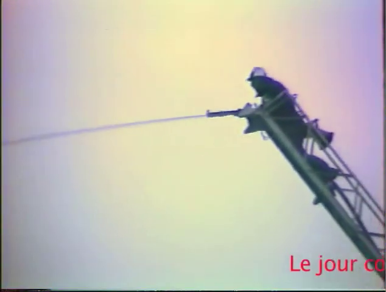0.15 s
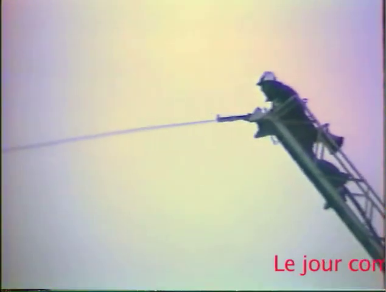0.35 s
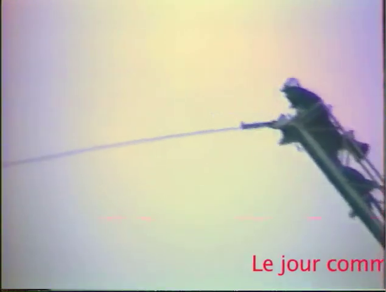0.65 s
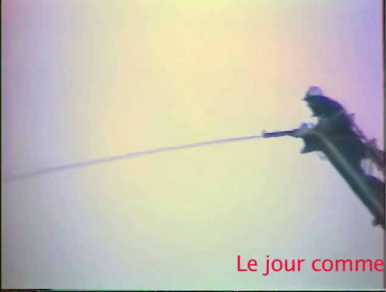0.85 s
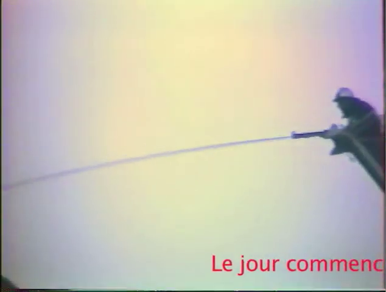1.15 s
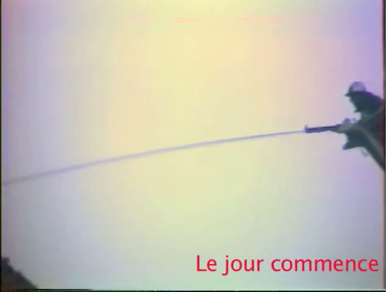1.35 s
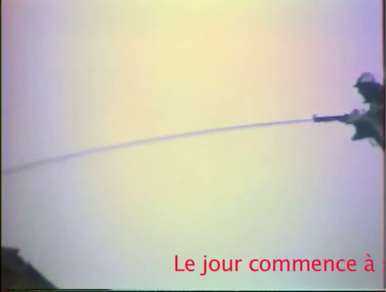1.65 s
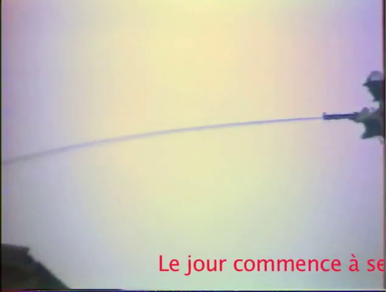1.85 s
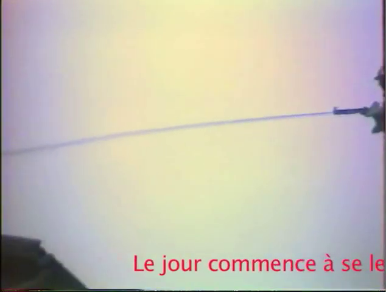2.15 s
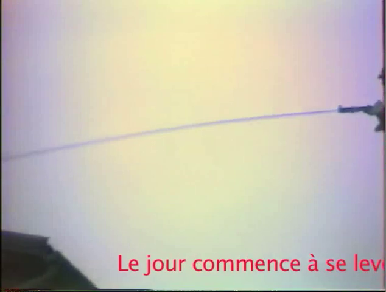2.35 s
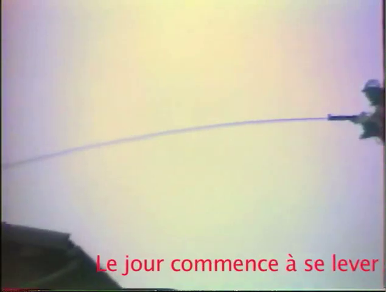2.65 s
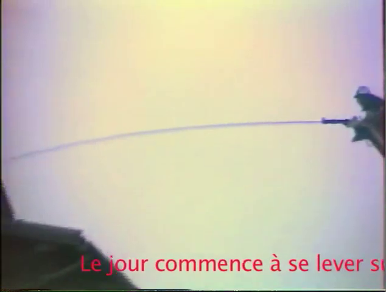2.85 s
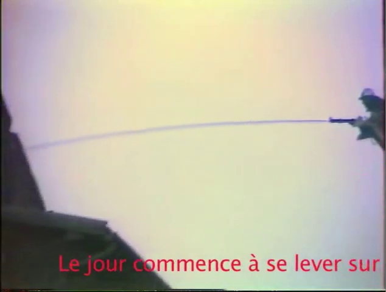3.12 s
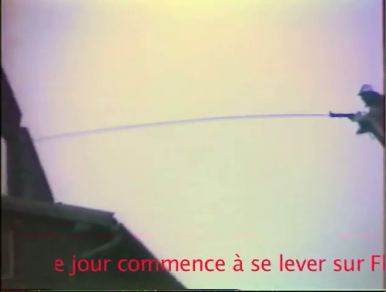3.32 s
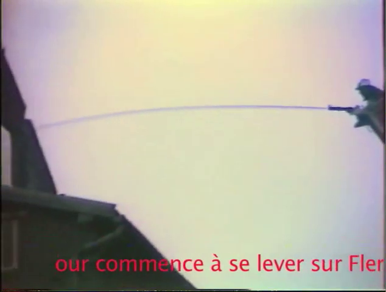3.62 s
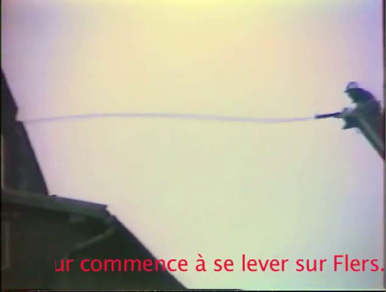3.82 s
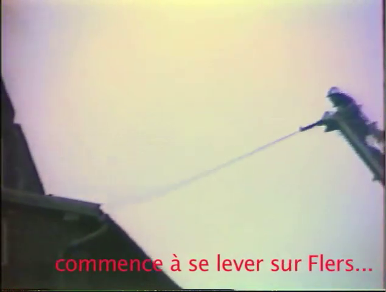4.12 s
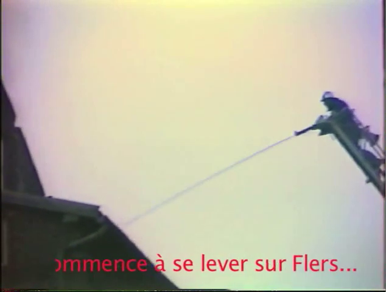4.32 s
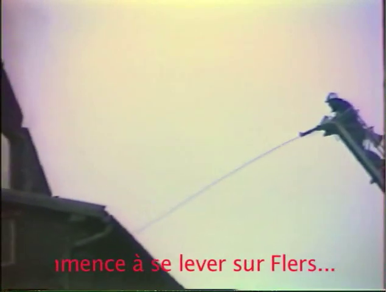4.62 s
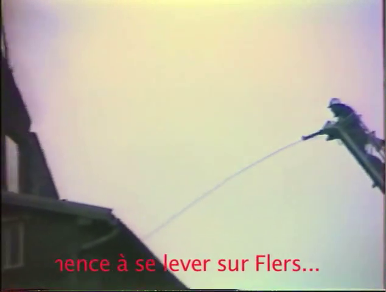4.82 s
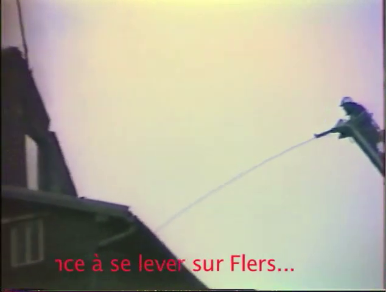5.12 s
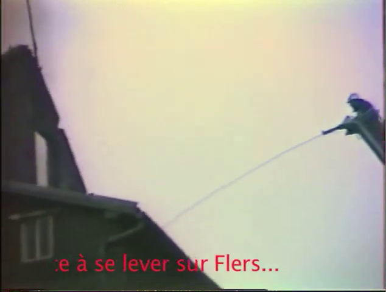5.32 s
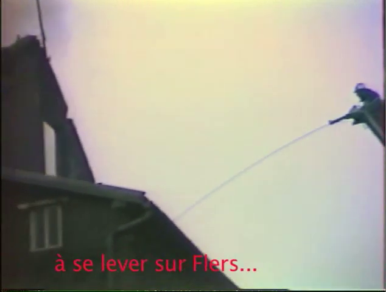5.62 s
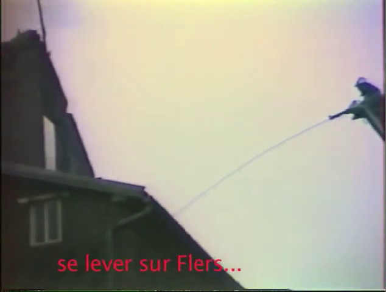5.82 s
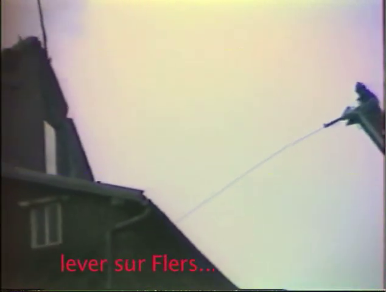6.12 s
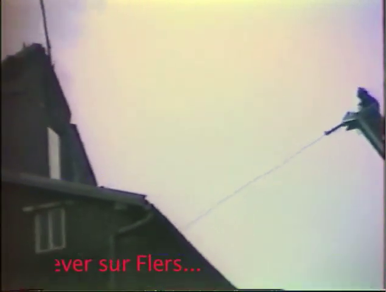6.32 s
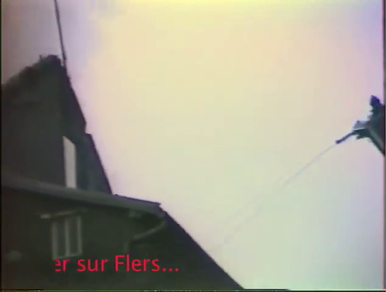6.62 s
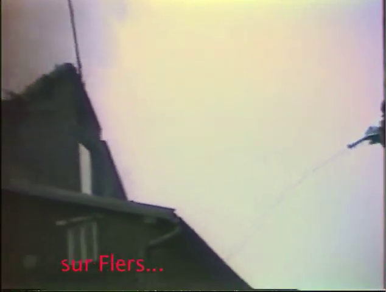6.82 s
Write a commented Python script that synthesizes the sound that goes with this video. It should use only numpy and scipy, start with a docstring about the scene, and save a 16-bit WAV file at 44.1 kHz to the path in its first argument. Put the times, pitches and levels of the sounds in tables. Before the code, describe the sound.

Constant buzzing engine and pump drone around 260 to 305 hertz, rapidly beating, over thin metal ringing and steady water hiss.

```python
"""A throbbing drone stands in front: two loud engine orders of a fire engine's motor beat once a turn.
The shaft turns about 44 times a second and drives the water pump; two firings a turn add a thud.
Upper orders growl, two panels buzz, shaped noise clatters once a turn and narrow resonances ring thinly.
Water hisses brightly through the hose and out of the nozzle on the ladder, as noise pulsing with the shaft.
A second, fainter engine hums just above the firing rate. One microphone feeds both channels."""
import sys
import numpy as np
from scipy import signal
from scipy.fft import rfft, irfft, next_fast_len
from scipy.io import wavfile

SR = 44100
rng = np.random.default_rng(int(sys.argv[2]) if len(sys.argv) > 2 else 0)


def wav_out(sig):
    """Save sig, one row per channel (or a flat mono array), as 16-bit PCM at SR to the path in sys.argv[1]."""
    wavfile.write(sys.argv[1], SR, np.round(np.clip(np.atleast_2d(sig).T, -1, 1) * 32767).astype(np.int16))


N = 306936

# Shaft speed, hunting and sagging once: (time [s], speed [turns/s])
SHAFT_SPEED = [(0.0, 43.81), (0.6, 43.54), (1.08, 43.76), (1.2, 43.6), (1.68, 43.78), (1.92, 43.62),
               (3.6, 43.67), (3.84, 43.22), (3.96, 43.54), (4.56, 43.77), (4.92, 43.55), (5.16, 43.77),
               (5.4, 43.53), (5.52, 43.81), (5.76, 43.55), (5.88, 43.86), (6.0, 43.58), (6.96, 43.95)]
# Upper orders of the growl, relative to its level: (order [multiples of shaft speed], level [dB])
GROWL_ORDERS = [(9.5, -26), (10.5, -28), (12, -17), (13, -18.5), (13.5, -28), (14, -24.5), (17, -23.5),
                (18, -21), (19, -21.5), (20, -28), (22, -31.5), (23, -24), (24.5, -27), (25, -34),
                (26, -31), (28, -29.5), (30, -28), (31, -38), (36, -23.5)]
# Spectrum shape of block and pump noise: (frequency [Hz], relative density [dB])
CLATTER_SPECTRUM = [(25, -34), (60, -19), (110, -11), (140, -6), (180, -10), (280, 9), (370, -1), (650, 0),
                    (920, -3), (1150, -1), (1700, -2.5), (2300, -10.5), (3500, -14.5), (9000, -18)]
# Spectrum shape of water in hose and nozzle: (frequency [Hz], relative density [dB])
WATER_SPECTRUM = [(1000, -19), (2500, -4.5), (3400, -6), (4600, -5), (6000, -3), (7200, -0.5), (8200, -0.5),
                  (9300, 2), (10200, -0.5), (11000, -19.5)]
# Ringing modes of the metal: (frequency [Hz], width [Hz], level relative to the ringing layer [dB])
METAL_MODES = [(1196, 97, -16), (1940, 160, -9.5), (2522, 36, -16), (2738, 20, -16), (3800, 130, -13),
               (5080, 87, -13), (5350, 200, -9), (6180, 59, -12), (6720, 60, -10), (6940, 90, -10),
               (7390, 200, -5.5), (7496, 63, -1), (7710, 110, 0.5), (8710, 105, -3), (10065, 83, -7.5)]
# Low exhaust orders, in or against phase: (order [multiples of shaft speed], level [dB], sign [+1 or -1])
EXHAUST_ORDERS = [(1, -68, 1), (3, -62.5, -1), (4, -45.5, -1), (4.5, -54, 1), (5, -42.5, 1), (8, -47, -1),
                  (9, -42, 1), (10, -46, 1), (11, -45.5, 1)]
# Rate of the second engine's hum above the firing rate: (time [s], beat rate [beats/s])
SECOND_ENGINE_BEAT_RATE = [(0, 3.45), (3.7, 3.45), (3.9, 3.9), (6.96, 3.9)]
# Level laws of the layers, before their own offsets and swings:
# (level at governed speed and time 0 [dB], change with speed [dB per turn/s], creep [dB/s])
SIXTH_ORDER_LAW = (-28, -5, 0.046)
SEVENTH_ORDER_LAW = (-24.5, -0.5, -0.27)
THUD_LEVEL_LAW = (-48.0, 1.0, 0.25)
GROWL_LEVEL_LAW = (-26, 8.7, 0.23)
CLATTER_LEVEL_LAW = (-33, 3.5, 0.12)
HISS_LEVEL_LAW = (-31.0, 2.4, 0.2)   # shared by ringing and water

GOVERNED_SPEED = 43.66   # turns per second
CUTOFF_HZ = 10500
SECOND_ENGINE_DB, FIRST_BEAT_S = -59, 0.059

# Just after the speed sags, the buzz passes briefly from the high panel to the low one
SHIFT_S, SHIFT_HALF_LENGTH_S = 3.94, 0.12   # centre, and time from there to half height
LOW_PANEL_DB, LOW_PANEL_SHIFT_DB = -53, 10.5   # shift in dB is added in full at the centre
HIGH_PANEL_DB, HIGH_PANEL_SHIFT_DB = -47, -5
SIXTH_SHIFT_DB, GROWL_SHIFT_DB, CLATTER_SHIFT_DB = 1.3, -5, 0.2


def from_db(db):
    """Decibels to amplitude gain."""
    return 10 ** (np.asarray(db) / 20)


def rms_one(x):
    """Scale to unit power."""
    return x / np.sqrt(np.mean(x ** 2) + 1e-20)


def curve_in_time(rows):
    """Join (time, value) points by straight lines, one value a sample."""
    times, values = np.transpose(rows)
    return np.interp(np.arange(N) / SR, times, values)


def drift(rate_hz):
    """Random wandering of unit power: noise through two equal low-pass poles at rate_hz."""
    step = 40   # samples between computed points
    pole = np.exp(-2 * np.pi * step * rate_hz / SR)
    noise = rng.standard_normal(N // step + 2002)
    slow = signal.lfilter([1], [1, -2 * pole, pole * pole], noise)
    slow = rms_one(slow[2000:])   # drop the filter's start
    return np.interp(np.arange(N) / step, np.arange(len(slow)), slow)


def coloured_noise(spectrum):
    """Unit-power noise, its spectrum joined by straight lines in dB over log frequency."""
    hz, db = np.transpose(spectrum)
    size = next_fast_len(N, real=True)
    bins_hz = np.maximum(np.fft.rfftfreq(size, 1 / SR), 1)
    gain = from_db(np.interp(np.log(bins_hz), np.log(hz), db))
    white = rfft(rng.standard_normal(size))
    return rms_one(irfft(white * gain, size)[:N])


def ringing_noise(hz, width_hz):
    """Unit-power noise through one two-pole resonance, as of a struck or rubbed part."""
    r = np.exp(-np.pi * abs(width_hz) / SR)
    feedforward = np.array([1, 0, -1]) * (1 - r * r) / 2
    feedback = [1, -2 * r * np.cos(2 * np.pi * hz / SR), r * r]
    return rms_one(signal.lfilter(feedforward, feedback, rng.standard_normal(N)))


def throb(angle, per_turn, per_firing, per_valve):
    """Loudness swings once a turn, against the drone's beats, with the firings and valve closings."""
    swing = 1 - per_turn * np.cos(angle)
    swing -= per_firing * np.cos(2 * angle)
    swing += per_valve * np.sin(4 * angle)
    return rms_one(swing)


def tone(angle, order, waver_db, waver_hz):
    """One engine order, a sine locked to the crank, of unit power with a wavering level."""
    return rms_one(np.cos(order * angle) * from_db(waver_db * drift(waver_hz)))


def level_db(law, speed):
    """A layer's level from the shaft speed and the time."""
    base_db, db_per_speed, db_per_s = law
    return base_db + db_per_speed * (speed - GOVERNED_SPEED) + db_per_s * np.arange(N) / SR


def panel_shift():
    """A flat-topped swell from 0 to 1 and back while the buzz changes panels."""
    away = (np.arange(N) / SR - SHIFT_S) / SHIFT_HALF_LENGTH_S
    return 1 / (1 + away ** 4)


def shaft(speed, unevenness=.0012):
    """Crank angle in radians: the summed speed, with a small random unevenness (fraction of speed)."""
    return 2 * np.pi * np.cumsum(speed * (1 + unevenness * drift(12.3))) / SR


def drone(angle, speed, twist_rad=0.03):
    """Orders six and seven beat at shaft speed; unequal cylinders twist the crank once in two turns."""
    twisted = angle + twist_rad * np.cos(angle / 2)
    sixth_db = level_db(SIXTH_ORDER_LAW, speed) + SIXTH_SHIFT_DB * panel_shift()
    sixth = from_db(sixth_db) * tone(twisted, order=6, waver_db=0.17, waver_hz=13)
    seventh_db = level_db(SEVENTH_ORDER_LAW, speed)
    seventh = from_db(seventh_db) * tone(twisted, order=7, waver_db=0.1, waver_hz=15)
    # no two turns burn alike, so the beats flutter in strength
    flutter = 1 + .035 * ringing_noise(hz=18, width_hz=6)
    return (sixth + seventh) * flutter


def exhaust(angle, speed):
    """Two firings a turn thud; weaker orders, in or against phase, flatten the drone's beat."""
    thud = from_db(level_db(THUD_LEVEL_LAW, speed)) * tone(angle, order=2, waver_db=0, waver_hz=5)
    weaker = 0
    for order, db, sign in EXHAUST_ORDERS:
        weaker += np.sign(sign) * from_db(db) * tone(angle, order, waver_db=1.15, waver_hz=3.8)
    return thud + weaker


def growl(angle, speed, lead_turns=.32, scatter_rad=0.064, smear_rad=.3):
    """Upper orders pulse ahead of the drone's beats, each by its own unsteady path."""
    lines = 0
    for order, db in GROWL_ORDERS:
        path = 2 * np.pi * lead_turns + scatter_rad * rng.standard_normal()
        path += smear_rad / order * drift(3.3)
        lines += from_db(db) * tone(angle + path, order, waver_db=1.5, waver_hz=3)
    growl_db = level_db(GROWL_LEVEL_LAW, speed) + GROWL_SHIFT_DB * panel_shift()
    return from_db(growl_db) * lines


def panel_buzz(angle):
    """Two panels buzz, the low one on the sixteenth order and the high one on the twenty-fourth."""
    low_db = LOW_PANEL_DB + LOW_PANEL_SHIFT_DB * panel_shift()
    high_db = HIGH_PANEL_DB + HIGH_PANEL_SHIFT_DB * panel_shift()
    low = from_db(low_db) * tone(angle, order=16, waver_db=2.5, waver_hz=9.5)
    high = from_db(high_db) * tone(angle, order=24, waver_db=4.5, waver_hz=7.9)
    return low + high


def clatter(angle, speed):
    """Mechanical noise of block and pump swells every turn, with a tinny ring of the high panel."""
    ring_db = -16.5 + HIGH_PANEL_SHIFT_DB * panel_shift()   # relative to the noise
    ring = from_db(ring_db) * ringing_noise(hz=1028, width_hz=40)
    noise = coloured_noise(CLATTER_SPECTRUM) + ring
    clatter_db = level_db(CLATTER_LEVEL_LAW, speed) + CLATTER_SHIFT_DB * panel_shift()
    clatter_db += 0.87 * drift(12)
    return from_db(clatter_db) * noise * throb(angle, per_turn=0.16, per_firing=0.029, per_valve=0.081)


def ringing(angle, hiss_db):
    """Rubbing and ticking parts keep the metal ringing, each mode fluttering by itself."""
    modes = 0
    for hz, width_hz, db in METAL_MODES:
        modes += from_db(db + 1.86 * drift(12.4)) * ringing_noise(hz, width_hz)
    return from_db(hiss_db - 8.0) * modes * throb(angle, per_turn=0.13, per_firing=0.12, per_valve=0.12)


def water(angle, hiss_db):
    """Bright rush of water under pressure: turbulent noise pulsing slightly with the pump."""
    rush = from_db(hiss_db - 2.5 + 0.51 * drift(42)) * coloured_noise(WATER_SPECTRUM)
    return rush * throb(angle, per_turn=0.084, per_firing=0.018, per_valve=0.018)


def second_engine(angle):
    """A second, fainter engine hums slightly above the firing rate and beats against the thud."""
    beat_rate = curve_in_time(SECOND_ENGINE_BEAT_RATE)
    beats = np.cumsum(beat_rate) / SR - beat_rate[0] * FIRST_BEAT_S
    return from_db(SECOND_ENGINE_DB) * rms_one(np.cos(2 * angle + 2 * np.pi * beats))


def scene():
    """One shaft drives engine and pump; a single microphone feeds two identical channels."""
    speed = curve_in_time(SHAFT_SPEED)
    angle = shaft(speed)
    hiss_db = level_db(HISS_LEVEL_LAW, speed) + .25 * drift(3)
    engine = drone(angle, speed) + exhaust(angle, speed)
    engine += growl(angle, speed) + panel_buzz(angle)
    engine += clatter(angle, speed) + ringing(angle, hiss_db)
    at_microphone = engine + water(angle, hiss_db) + second_engine(angle)
    return np.tile(at_microphone, (2, 1))


def record(dry):
    """A steep elliptic low-pass removes the top above the cutoff."""
    low_pass = signal.ellip(12, .1, 85, CUTOFF_HZ, fs=SR, output="sos")   # 0.1 dB ripple, 85 dB down
    return signal.sosfilt(low_pass, dry)


dry = scene()
out = record(dry)
wav_out(out)
```